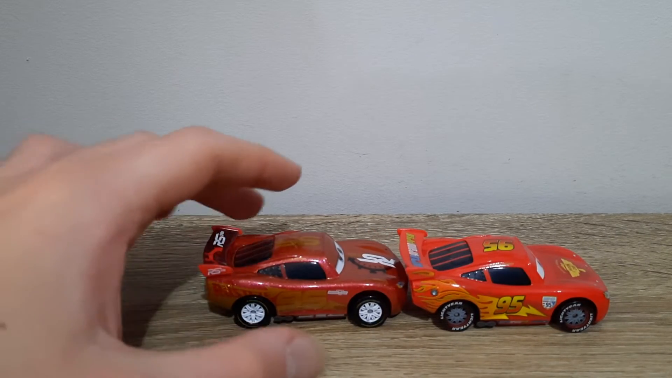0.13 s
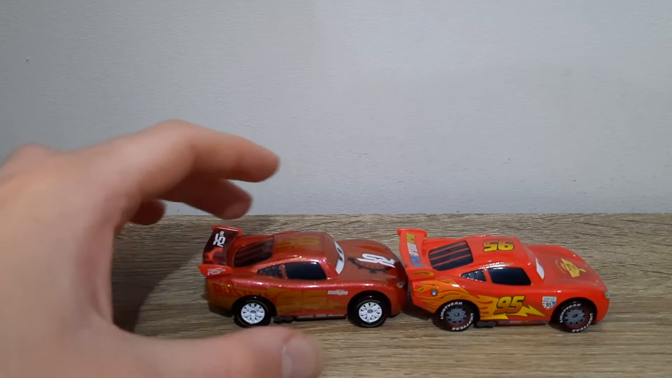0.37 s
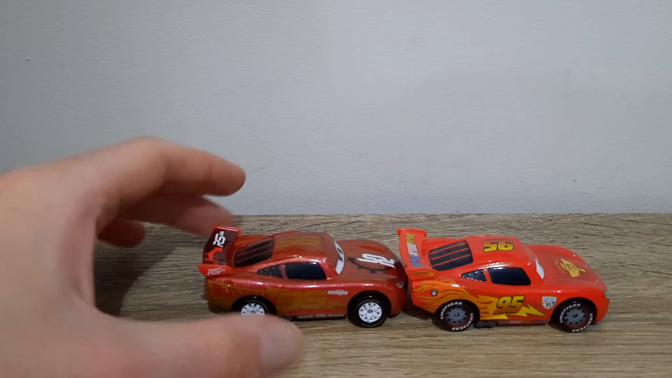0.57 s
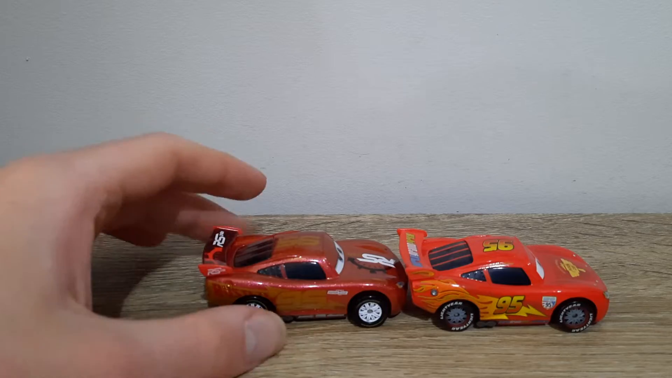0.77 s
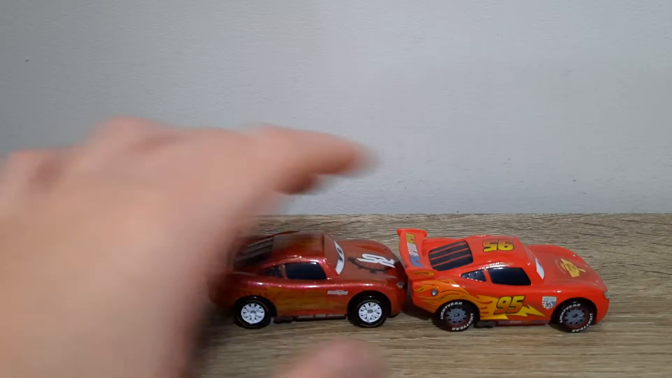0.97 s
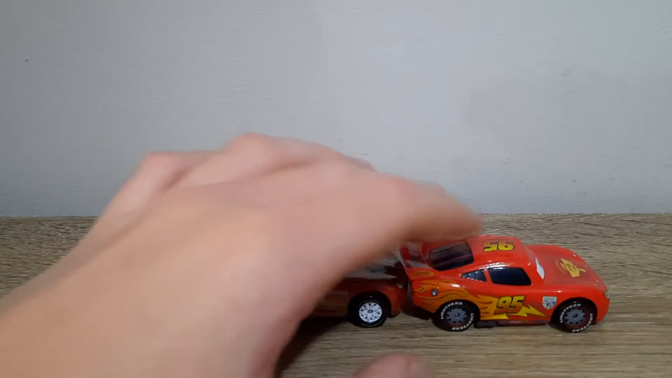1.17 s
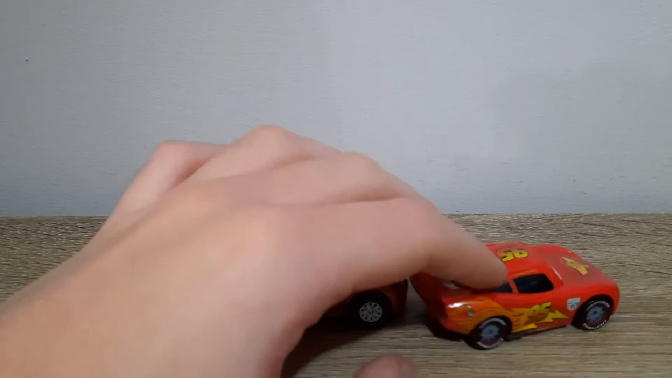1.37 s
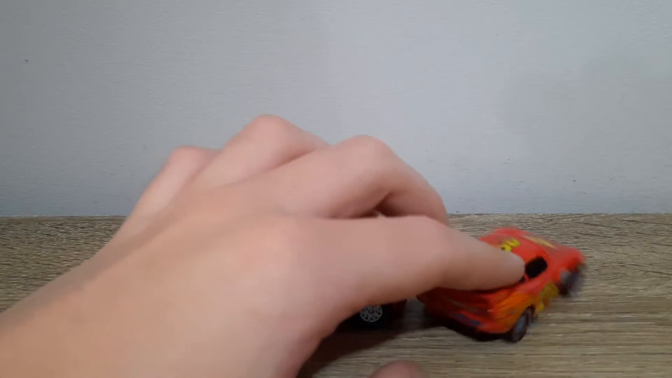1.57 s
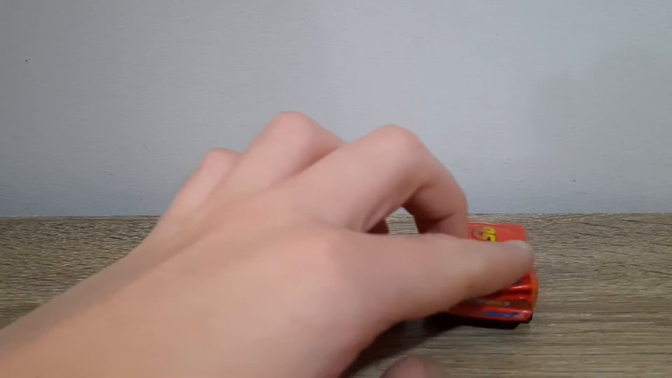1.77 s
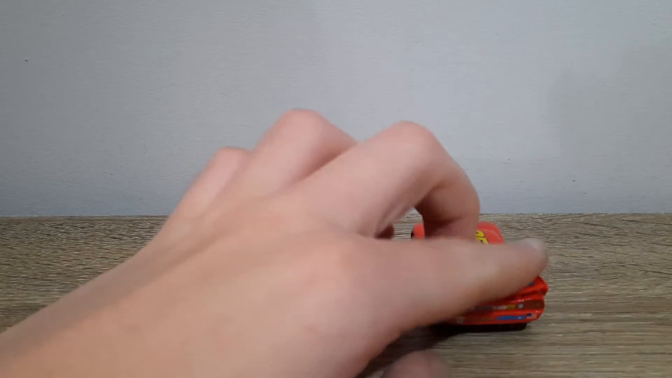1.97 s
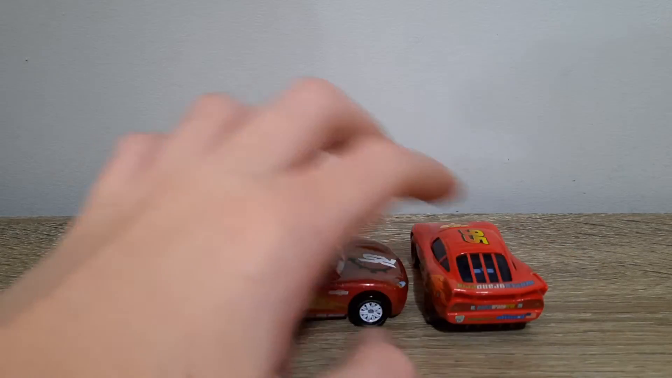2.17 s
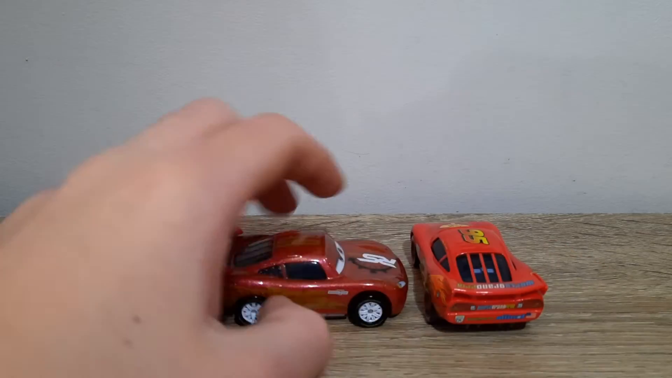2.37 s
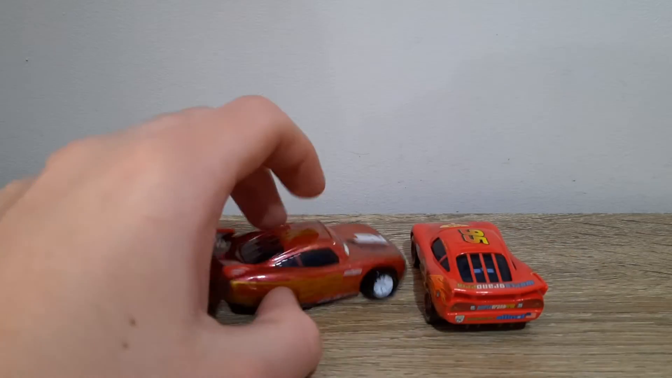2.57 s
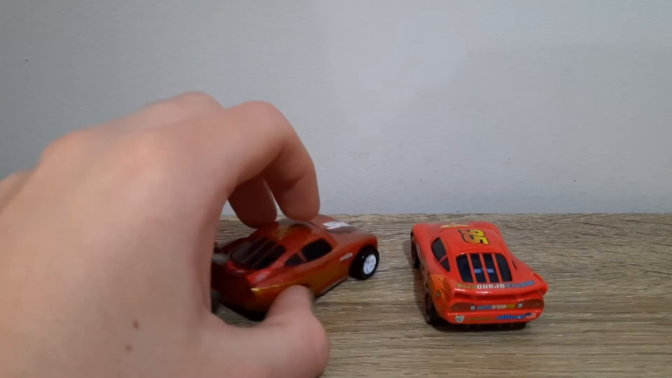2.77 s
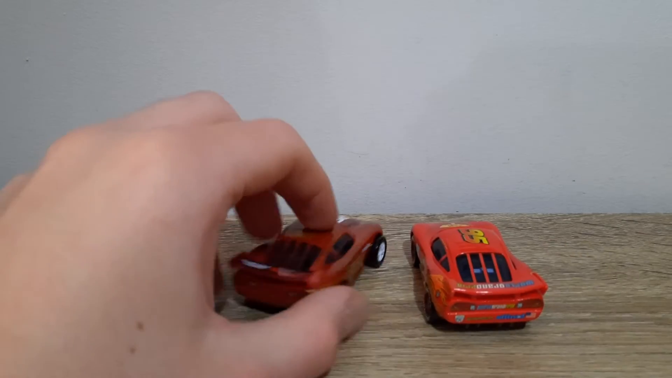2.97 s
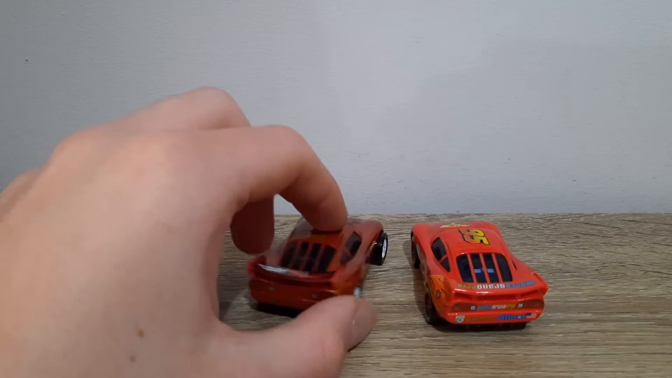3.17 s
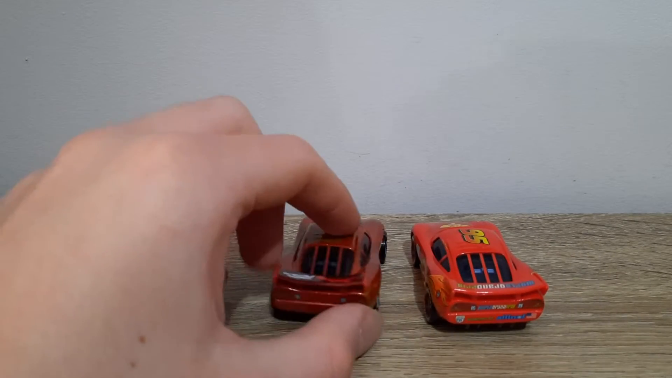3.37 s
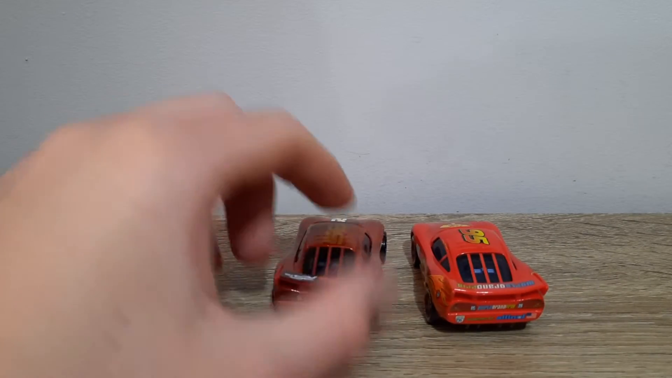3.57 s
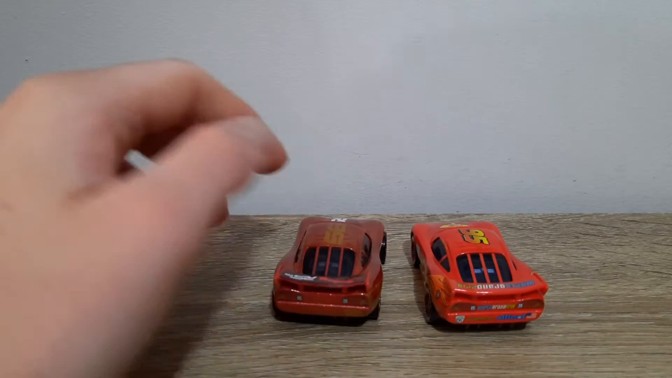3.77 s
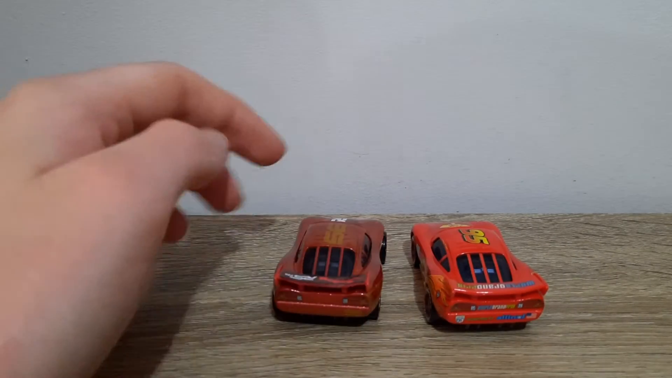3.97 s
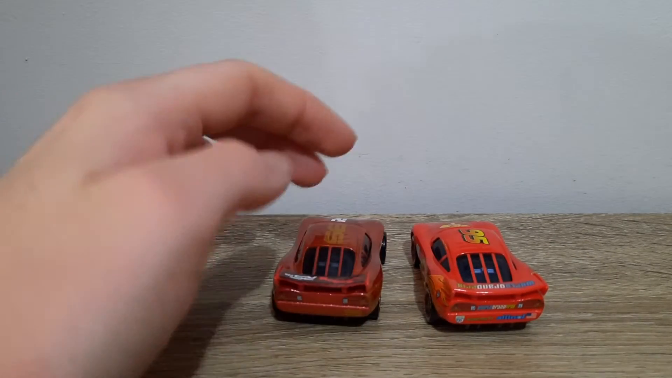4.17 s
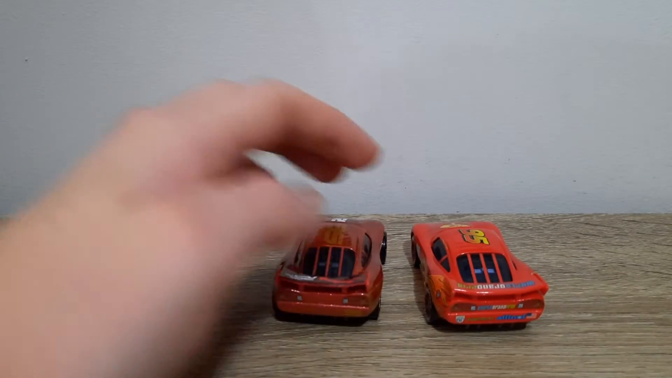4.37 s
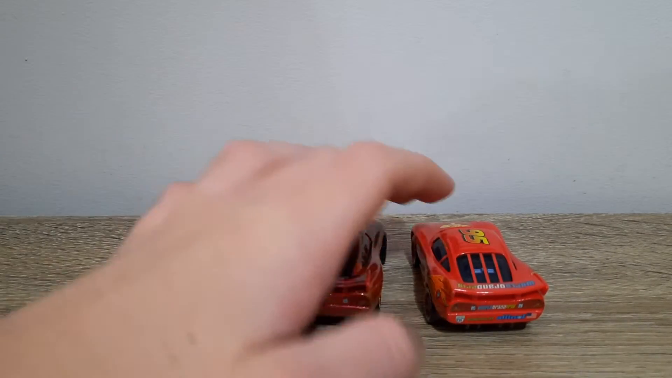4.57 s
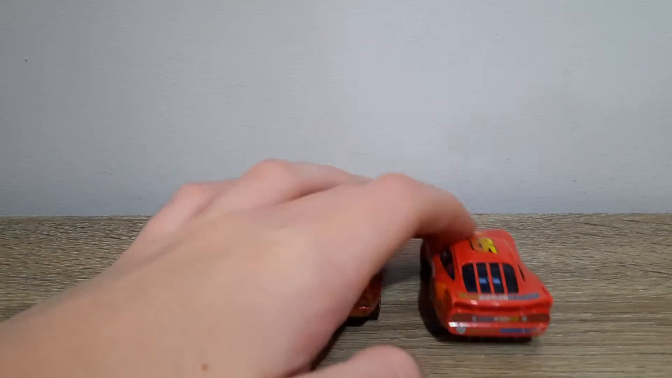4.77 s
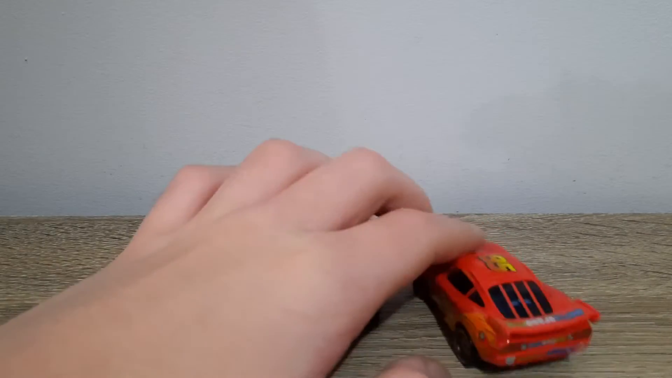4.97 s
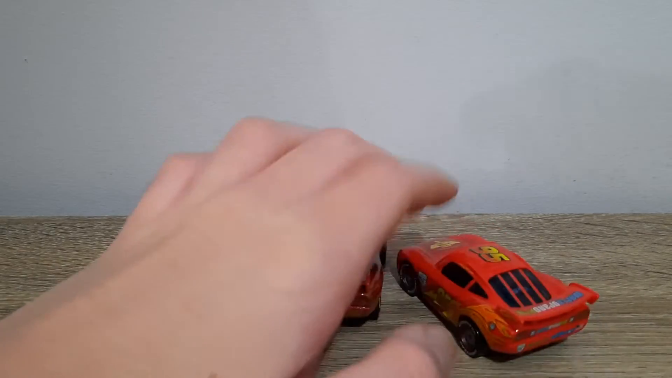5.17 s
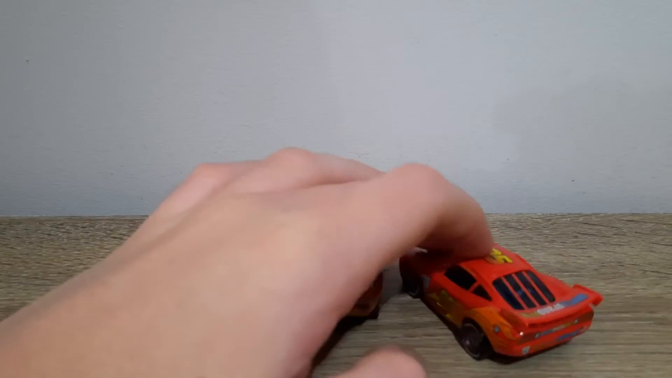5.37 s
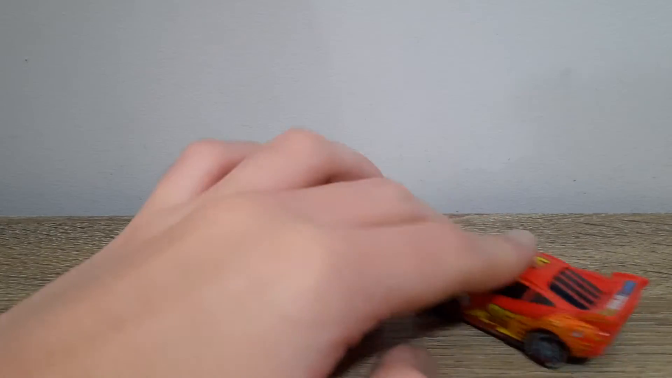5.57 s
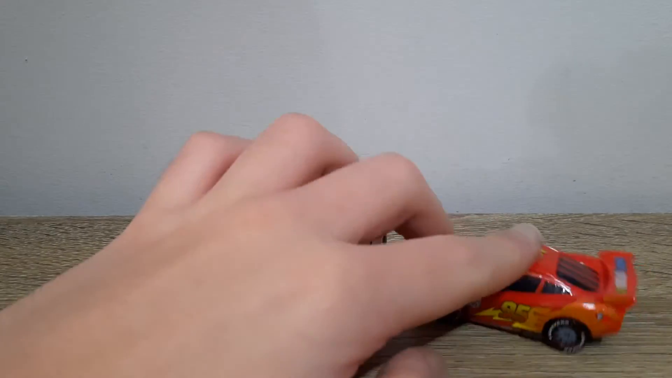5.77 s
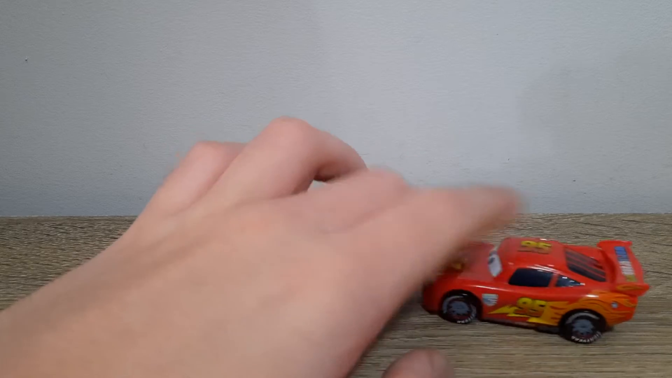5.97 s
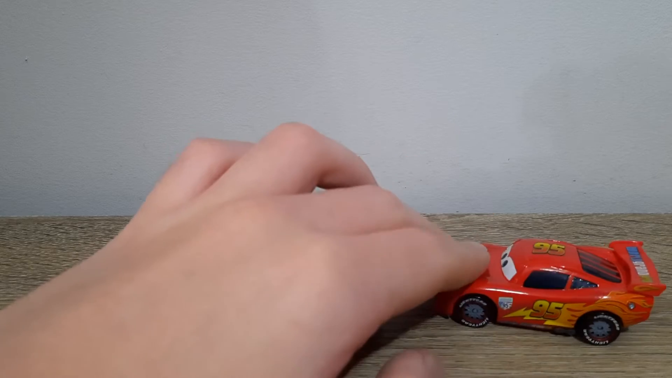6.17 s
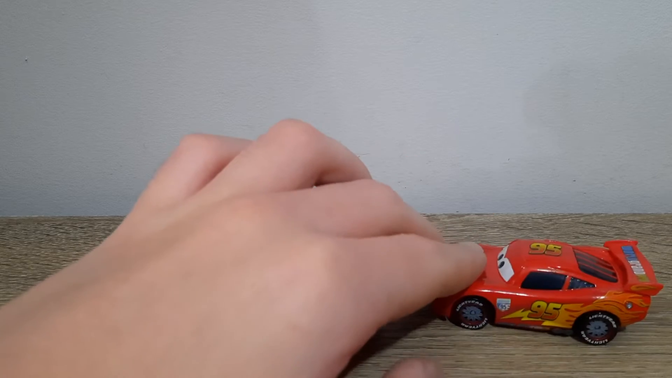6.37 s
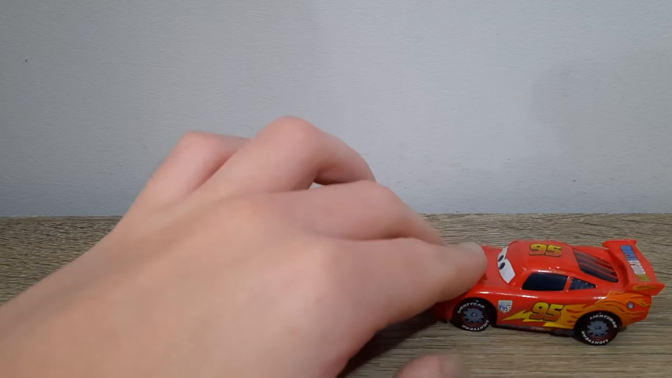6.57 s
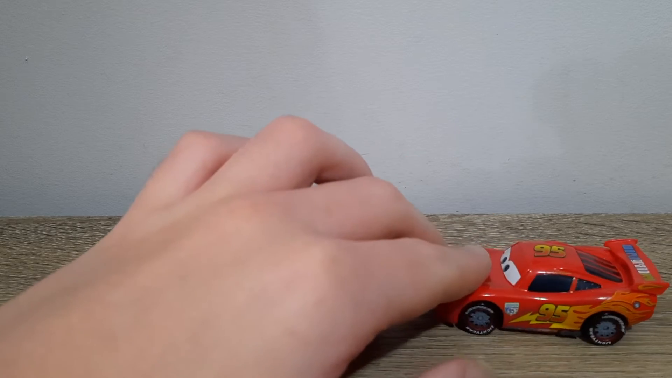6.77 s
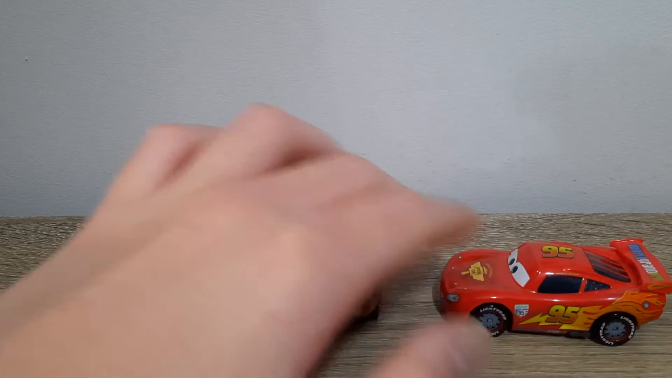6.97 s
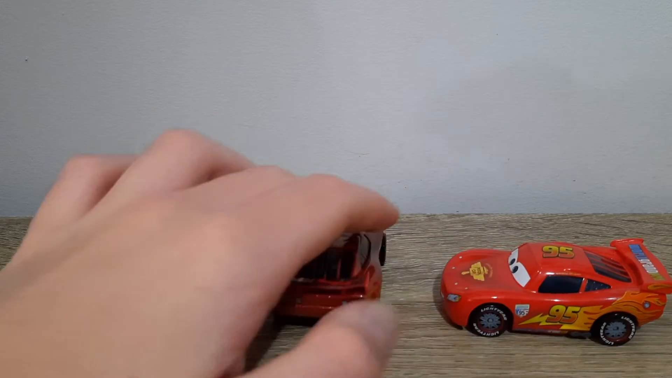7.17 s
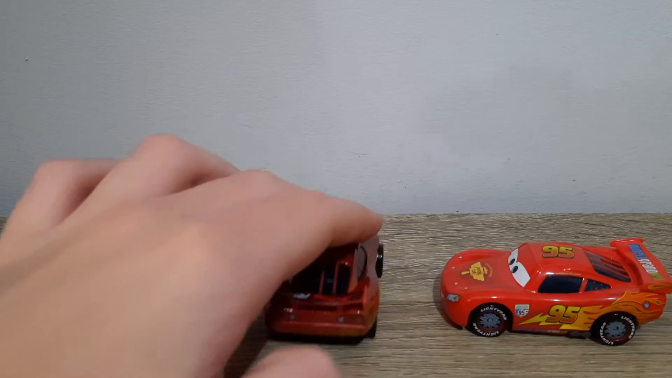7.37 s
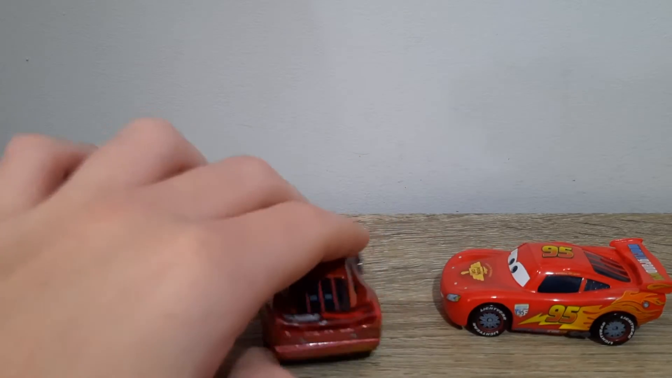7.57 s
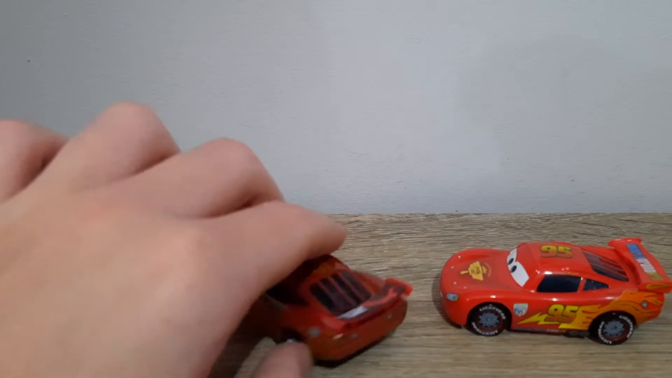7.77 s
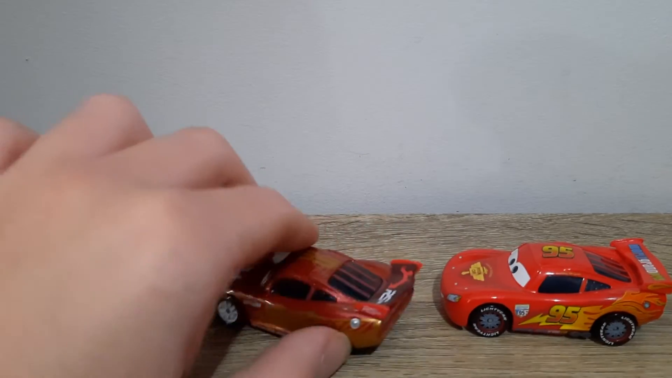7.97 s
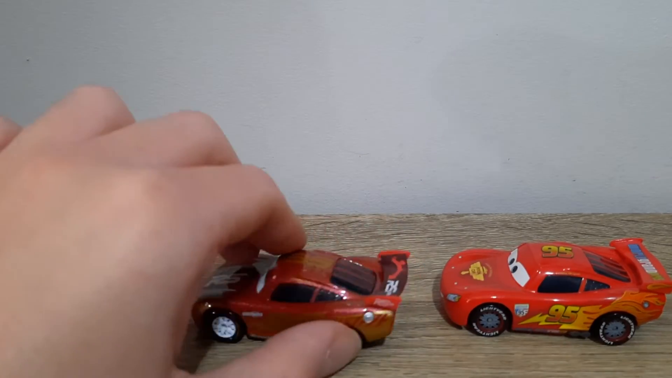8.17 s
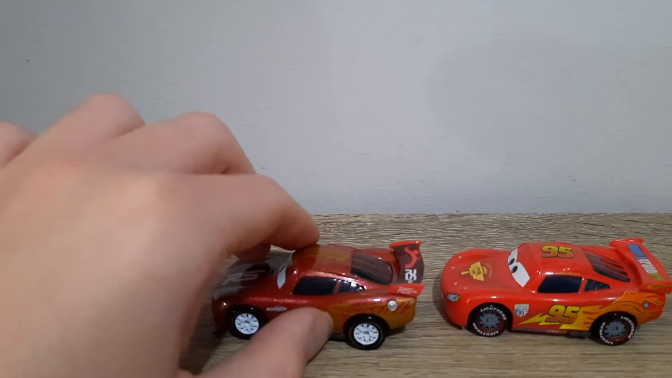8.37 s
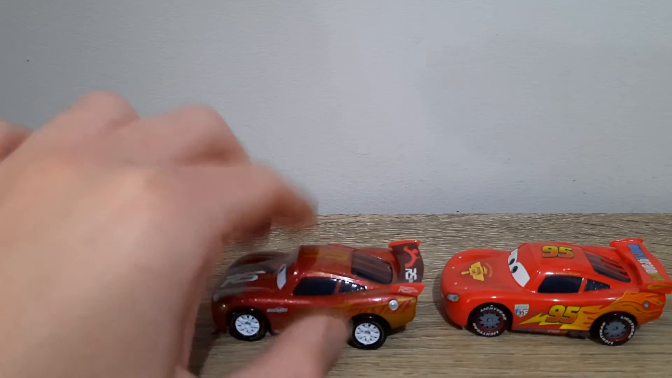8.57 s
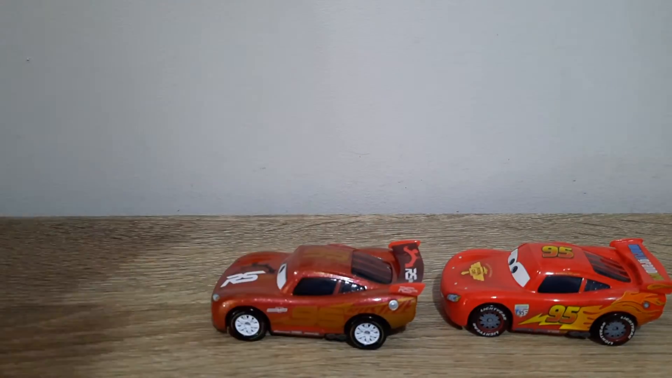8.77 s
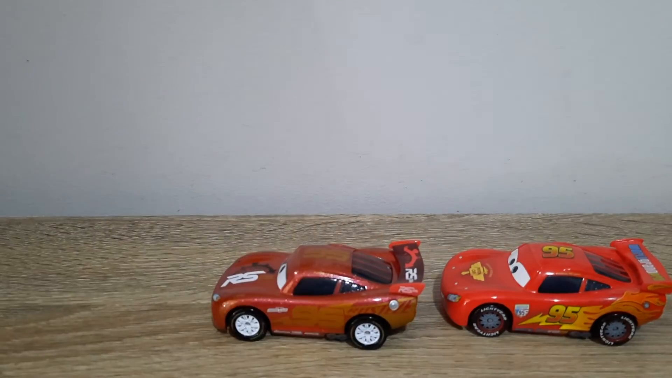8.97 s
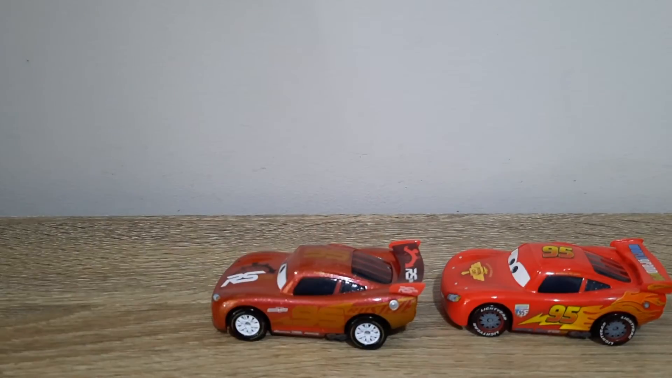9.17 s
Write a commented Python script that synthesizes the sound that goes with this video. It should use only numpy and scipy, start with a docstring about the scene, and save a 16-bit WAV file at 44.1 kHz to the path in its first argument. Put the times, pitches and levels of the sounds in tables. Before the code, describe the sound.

Two small toy cars are twisted by hand on a wooden table, wheels stuttering and rattling with low thumps, ending in a muffled rub and sharp knock.

```python
"""Two toy cars, an orange and a dark red one, are turned round by hand on a wooden table, close to a phone.
Stuttering wheels and low thumps drive the table's damped modes; jolts and skids drive shells and axles.
Tyres squeal by stick-slip as gliding harmonics; axles chirp and wheels creak as jittered sine glides.
At the end a muffled rub (coloured grains) and a sharp knock (case modes) come beside the left microphone.
A short noise tail stands for the small room, and coloured noise for its low rumble and faint hiss."""
import sys
import numpy as np
from scipy import signal
from scipy.fft import rfft, irfft, next_fast_len
from scipy.io import wavfile
from scipy.ndimage import uniform_filter1d

SR = 44100
rng = np.random.default_rng(int(sys.argv[2]) if len(sys.argv) > 2 else 0)


def dump_mix(stems):
    """Bounce the given channels to the path in sys.argv[1] as a 16-bit WAV at rate SR."""
    frames = np.atleast_2d(stems).T  # one column per channel
    limited = np.clip(frames, -1, 1)  # hard clip at full scale
    pcm = np.round(limited * 32767).astype(np.int16)
    wavfile.write(sys.argv[1], SR, pcm)


N = 407043  # samples
T = np.arange(N) / SR  # s
RING_T, SHORT_T = T[:SR // 8], T[:SR // 30]  # s: long and short responses
SIDES = np.array([[.5], [-.5]])  # left and right share of a level or phase difference

# All levels in the tables are relative; each layer adds its own trim.
# Shoves of a car. Each row: start of full speed in seconds, hold, rise and fall in seconds, drumming in dB,
# then relative to the drumming: weight on the table in dB, shell rattle in dB, tyre grit in dB.
SHOVES = [(1.317, 0.087, 0.034, 0.082, -43, 3, -7, -21), (1.553, 0.13, 0.031, 0.078, -40, -2.5, -5.5, -17),
          (1.758, 0.11, 0.045, 0.043, -46.5, -5.5, -5.5, -9.5),
          (1.941, 0.062, 0.019, 0.03, -58, -5, -16, -15),
          (2.368, 0.036, 0.039, 0.073, -53.5, 10.5, -20, -32.5),
          (2.465, 0.016, 0.019, 0.038, -40, 10, -12, -29),
          (2.552, 0.12, 0.0092, 0.034, -39, -8, -14.5, -37), (2.667, 0.085, .02, 0.052, -60, 2, -6, -31),
          (2.792, 0.027, 0.039, 0.1, -44, 8, -9.5, -32), (2.938, 0.12, 0.051, 0.084, -44, 1.5, -22.5, -44),
          (3.043, 0.008, 0.023, 0.08, -42.5, 7.5, -23, -38),
          (3.25, 0.048, 0.15, 0.11, -48.5, 1, -25.5, -51),
          (3.336, 0.11, 0.15, 0.047, -53.5, 6.5, -26.5, -53),
          (4.789, 0.042, 0.031, 0.083, -44, 7.5, -15, -28),
          (5.019, 0.016, 0.073, 0.029, -24.5, 2, -16.5, -21),
          (5.082, 0.098, 0.06, 0.049, -50, 13.5, -10, -15),
          (5.52, 0.069, 0.055, 0.019, -36.5, -6, -11, -20), (5.633, .04, 0.072, 0.019, -37, 6.5, -22, -41),
          (5.762, 0.16, 0.056, 0.027, -39.5, -3.5, -11.5, -29),
          (5.98, 0.13, .05, 0.098, -72.5, 17.5, -13, -3.5), (6.18, 0.092, 0.031, 0.17, -65.5, 6, -16, -20),
          (6.439, 0.089, 0.03, 0.12, -68.5, 4, -18.5, -30.5),
          (6.79, 0.0079, 0.011, 0.36, -68.5, 4.5, 1, -12.5),
          (7.414, 0.13, 0.087, 0.066, -50.5, 12, -30, -31.5), (7.619, 0.16, 0.058, 0.05, -36, 7, -23, -49),
          (7.683, 0.0096, 0.054, 0.022, -33, -10, -23, -46),
          (7.868, 0.05, 0.17, 0.053, -40.5, 6, -18.5, -36.5),
          (8.052, 0.006, 0.056, 0.041, -40, 1, -22, -40.5),
          (8.097, 0.073, 0.052, 0.081, -47.5, 6.5, -19.5, -42),
          (8.314, 0.021, 0.014, 0.069, -45.5, 10.5, -8.5, -28),
          (8.479, 0.08, 0.041, 0.063, -70, 21, -35, -28)]
# Jolts of a chassis in its play. Each row: time in seconds, knock on the table in dB, shell rattle in dB,
# axle tick in dB.
CLACKS = [(1.316, -32, -39, -52), (1.354, -26, -36, -45.5), (1.374, -33, -49, -56.5),
          (1.408, -26, -30.5, -39), (1.552, -40, -57, -47), (1.575, -34.5, -44.5, -47),
          (1.5997, -40.5, -32, -46), (1.619, -38.5, -43, -61), (1.631, -41.5, -39, -48.5),
          (1.641, -40, -38.5, -53), (1.652, -41.5, -37.5, -48), (1.668, -43, -43, -49),
          (1.688, -45, -37, -47), (1.692, -47, -36, -48), (1.733, -58, -52, -54), (1.771, -38, -49, -55),
          (1.808, -53, -42.5, -49.5), (1.826, -48, -48, -49), (1.8586, -40, -45.5, -44),
          (1.931, -53.5, -61, -59), (2.384, -49, -66, -79), (2.442, -46.5, -46, -53.5),
          (2.4857, -36.5, -43, -44), (2.553, -41.5, -39.5, -49), (2.58, -66.5, -54, -51.5),
          (2.606, -35, -36.5, -56.5), (2.629, -43.5, -38, -45), (2.6438, -33, -34.5, -41.5),
          (2.7648, -42, -52, -52.5), (2.7967, -37, -42.5, -61.5), (2.823, -41, -47.5, -57),
          (2.846, -45.5, -63, -73), (2.9394, -50, -49, -61), (3.028, -39.5, -58, -62.5),
          (3.0557, -42, -45.5, -56), (3.1917, -74, -67, -64.5), (3.226, -46, -78, -77.5),
          (3.2449, -40.5, -77, -84), (3.276, -47.5, -60, -79), (4.7335, -55, -51, -62.5),
          (4.7834, -46, -47.5, -60), (4.810, -40.5, -50, -59.5), (4.9168, -39, -48, -64),
          (4.951, -51, -43.5, -62), (4.9774, -42, -44, -48.5), (4.9941, -27, -32.5, -49.5),
          (5.012, -30, -46, -45), (5.024, -27.5, -52, -46.5), (5.036, -30.5, -43, -44),
          (5.079, -38, -58, -57), (5.1327, -41, -53, -60.5), (5.18, -49, -63, -61), (5.296, -64, -63, -66),
          (5.4745, -39.5, -69, -68), (5.5027, -33.5, -41, -57), (5.528, -29, -38, -44),
          (5.547, -34.5, -53, -58), (5.585, -30, -47, -59), (5.651, -35.5, -60, -92),
          (5.755, -38, -60, -71), (5.7849, -38.5, -48, -53), (5.8135, -27.5, -35.5, -49.5),
          (5.848, -33.5, -42, -57.5), (5.882, -35, -42.5, -54), (5.915, -35, -48, -61),
          (5.966, -72, -56, -76), (5.985, -50, -66, -71), (6.0087, -75, -73, -81), (6.09, -55, -80, -83),
          (6.1763, -64.5, -75, -77), (6.2057, -54, -72, -82), (6.434, -59.5, -80, -96),
          (6.49, -60.5, -73, -97), (6.8098, -39, -46, -46.5), (7.586, -39.5, -70.5, -74),
          (7.6163, -34, -58, -71.5), (7.662, -36, -56, -66), (7.705, -29, -46, -55.5),
          (7.763, -35.5, -59, -61.5), (7.861, -36, -37, -50), (7.883, -45, -49, -73.5),
          (7.902, -34.5, -45, -68), (7.915, -35.5, -53, -67), (8.052, -41, -53.5, -64),
          (8.103, -37.5, -60, -59), (8.173, -37.5, -55.5, -69), (8.3099, -42.5, -46.5, -45.5),
          (8.320, -39, -50, -53), (8.336, -36.5, -49, -54), (8.356, -43.5, -51, -55.5),
          (8.38, -44.5, -52.5, -55), (8.403, -46, -55, -61), (8.417, -48, -58, -65.5),
          (8.464, -49, -75, -60.5)]
# Low thumps and dull knocks on the table, from fingers, wrist or a car set down hard.
# Each row: time in seconds, low modes in dB, upper modes in dB.
THUMPS = [(0.942, -38, -51.5), (0.976, -34.5, -64), (2.188, -39, -74), (2.259, -45, -75),
          (2.621, -20.5, -56.5), (3.075, -27.5, -58), (4.164, -32.5, -65.5), (4.916, -28.5, -60),
          (6.796, -24.5, -51), (6.809, -43, -34.5), (6.925, -45.5, -49.5), (7.193, -43, -62.5),
          (7.331, -34, -46), (7.839, -20.5, -53), (7.854, -19, -61), (8.342, -30, -53), (8.359, -22, -55),
          (8.424, -28, -64.5), (8.494, -32, -46), (8.556, -38.5, -47.5)]
# Low and upper tabletop modes. Each row: frequency in Hz, width in Hz, level in dB,
# left minus right in dB, left's phase lead in radians.
TABLE_LOW = [(108, 29, -13, -3, 0.13), (127.5, 17, 11.5, 2.5, 0.3), (169, 25, 5.5, -1, 0),
             (208, 23, -0.5, 0.5, 0.077), (233, 13, -2, -7, 0.1), (283, 31, 17, -1.5, 0.58)]
TABLE_HIGH = [(540.4, 31.2, 4.5, 0.1, 0.46), (614, 39, -4.5, 1, 0.85), (715, 40, -7, -2.5, -1.5),
              (767.3, 23, -1.5, 1, -2), (958, 54, -14.5, 2.5, 3.5), (1096, 40, -10, 5, 3),
              (1310, 40, -12, 3, -4.5)]
TABLE_SCATTER, TABLE_DETUNE = .35, .014  # the modes change in balance and pitch as car and hand move


def tabletop(boom_db=-4.5, knock_db=21.0, flurry_db=-2, thud_db=17, thump_db=19, tap_db=16,
             settle_db=-17, settle_s=0.012, count=12):
    """Modal excitation: wheels, jolts and thumps ring the same board, its upper modes varying with the spot."""
    s, knock, _, _ = np.transpose(CLACKS)
    thump_s, thump, tap = np.transpose(THUMPS)
    shoves = np.array(SHOVES)
    *_, drumming, weight, _, _ = shoves.T
    orange, red = by_car(SHOVES)

    boom = band(grains(per_s=1500, spread_db=2), lo_hz=76.6, hi_hz=2000)
    low = undb(boom_db) * rolling(shoves, drumming + weight, BOOM_POWER) * boom
    low += blows(s, knock + thud_db, push_s=0.00023)
    low += blows(thump_s, thump + thump_db, push_s=0.001)
    settling = chatter(thump_s, thump + settle_db, np.full(len(thump_s), settle_s))
    low += settling * grains(per_s=780, spread_db=-2.0)  # each thump trails off in a few small contacts

    high = tyres(orange, roll_db=-5.0, slip_db=-11.0, slip_hz=265.5, bright_hz=1010)
    high += tyres(red, roll_db=-8.5, slip_db=-7.0, slip_hz=271.8, bright_hz=1900)
    high += jolts(s, knock + knock_db)
    high += blows(thump_s, tap + tap_db, push_s=0.000078)
    bouncing = chatter(s, knock + flurry_db, 1.57 * flurry_times(len(s)))
    high += bouncing * grains(per_s=3000, spread_db=2.5)  # the wheels bounce after a jolt

    spots = [ring(TABLE_HIGH, scatter=TABLE_SCATTER, detune=TABLE_DETUNE) for _ in range(count)]
    return through(low, ring(TABLE_LOW)) + shifting(high, spots)


def tyres(shoves, roll_db, slip_db, slip_hz, bright_hz):
    """Rolling contact: grain bumps plus stick-slip push the board; harder tyres reach higher."""
    *_, drumming, _, _, _ = shoves.T
    bumps = undb(roll_db) * grains(per_s=1400, spread_db=-0.5)
    force = bumps + undb(slip_db) * slips(slip_hz, glide=0.17, jitter=0.03516)
    return rolling(shoves, drumming, 0.72) * band(force, lo_hz=257, hi_hz=bright_hz)


def slips(hz, glide, jitter):
    """Stick-slip friction: a tyre dragged sideways lets go in pulses at a wandering rate; rms 1."""
    rate = hz * np.exp(glide * walk(rate=26) + jitter * walk(rate=500))
    pulses = np.diff(np.floor(np.cumsum(rate) / SR), prepend=0) / np.sqrt(rate)
    return pulses / pulses.std()


# The speed drops by EDGE_DB over one rise or fall time, and slightly more slowly beyond.
EDGE_DB, EDGE_CURVE = 23.5, 0.92
BOOM_POWER, RATTLE_POWER, GRIT_POWER = 0.6, 0.85, 0.55  # each sound grows as this power of the wheel speed


def rolling(shoves, db, power):
    """Speed-dependent excitation: the gain follows the wheel speed's rise, hold and fall in every shove."""
    t = np.arange(0, N, SR // 1000) / SR
    s, hold, rise, fall = shoves.T[:4, :, None]
    away = np.maximum(s - t, 0) / np.abs(rise) + np.maximum(t - s - hold, 0) / np.abs(fall)
    speed_db = -EDGE_DB * away ** EDGE_CURVE
    gain = np.linalg.norm(undb(db[:, None] + power * speed_db), axis=0)  # shoves add in power
    return np.interp(T, t, gain)


# A jolting tyre catches a few times in a row. Each entry: level of one catch in dB.
CATCHES_DB = [-4.5, 0.5, -5.5]
CATCH_S, CATCH_SCATTER = 0.00361, .06  # s between catches; relative spread from jolt to jolt


def jolts(times, db, lag_s=.002):
    """Repeated impact: each jolt pushes the board in a quick run of catches."""
    gap = CATCH_S * np.exp(CATCH_SCATTER * rng.standard_normal((len(times), 1)))
    catches = times[:, None] + lag_s + (np.arange(len(CATCHES_DB)) - 1) * gap
    return blows(catches.ravel(), (db[:, None] + CATCHES_DB).ravel(), push_s=0.00014)


# Shell modes of either car. Each row: frequency in Hz, width in Hz, level in dB,
# left minus right in dB, left's phase lead in radians.
ORANGE_SHELL = [(1270, 210, -0.5, 12.5, -6.5), (1896, 88, 5, 6.5, 0), (1900, 450, 5.5, 9, -4.5),
                (2470, 88, -6, -10, 3), (2720, 180, -17.5, 1, 2), (2930, 140, -6.5, 1.5, -3.5),
                (3436, 93, -7.5, -4, -1), (3878, 180, -13, -4.5, -1), (4250, 180, -12.5, -11.5, 3)]
RED_SHELL = [(1083, 54, -2, 16, 3), (1236, 190, -1, 10, 0.5), (1895, 100, -3, 18, -1),
             (2100, 220, 9.5, -2, 1.5), (2510, 230, -0.5, -3.5, -0.5), (2793, 82, -3.5, 7.5, -4),
             (3150, 37, -5, -3, -7.5), (4320, 110, -17.5, 25, -16), (4570, 110, -2, -5, -6),
             (4700, 75, -10.5, -8.5, -2)]


def cars():
    """Superposition: the two cars' sounds add, though the hand works on one at a time."""
    orange_shoves, red_shoves = by_car(SHOVES)
    orange_clacks, red_clacks = by_car(CLACKS)
    orange_car = car(orange_shoves, orange_clacks, ORANGE_SHELL, rattle_db=1.0, grit_db=-4.0, clack_db=2.5,
                     tick_db=6.5, stutter_db=4.5, crack_db=-8.5, fizz_db=2.5, pan_db=-7)
    red_car = car(red_shoves, red_clacks, RED_SHELL, rattle_db=5, grit_db=12.5, clack_db=4.5,
                  tick_db=5.0, stutter_db=1.5, crack_db=-3.0, fizz_db=-2.0, pan_db=-3.0)
    return orange_car + red_car


# Turns of the red car; the orange one has the rest. Each row: start in seconds, end in seconds.
RED_TURNS = [(2.2, 4.0), (6.6, 8.7)]


def by_car(table):
    """Separation in time: share out the rows of a table, the orange car's, then the red car's."""
    rows = np.array(table)
    red = np.any([(rows[:, 0] > start) & (rows[:, 0] < end) for start, end in RED_TURNS], axis=0)
    return rows[~red], rows[red]


# Axle modes of both cars. Each row: frequency in Hz, width in Hz, level in dB,
# left minus right in dB, left's phase lead in radians.
AXLE_MODES = [(5300, 860, -1, -10.5, -0.5), (6300, 260, -2, -10.5, -2), (6200, 780, -3, -8.5, 7),
              (8000, 1100, -8.5, -6.5, 1), (8180, 290, 0, -5, -1.5), (10100, 2000, -6, -7, -4),
              (11300, 770, -1.5, -12, 5.5), (11600, 1200, 0.5, -4.5, 4), (13920, 5800, -5, -5.5, -1.5)]
SHELL_DETUNE = .04  # relative spread of the shell's modes as the fingers press and turn it


def car(shoves, clacks, shell, rattle_db, grit_db, clack_db, tick_db, stutter_db, crack_db, fizz_db,
        pan_db, count=20):
    """Stick-slip into resonators: each catch of the skidding wheels shakes the shell and ticks the axles."""
    s, _, clack, tick = clacks.T
    *_, drumming, _, shake, scrape = shoves.T
    length = flurry_times(len(s))
    catches = undb(stutter_db * walk(rate=150)) * grains(per_s=1800, spread_db=1.5)
    flurry = grains(per_s=5500, spread_db=-1.0)

    rattle = undb(rattle_db) * rolling(shoves, drumming + shake, RATTLE_POWER) * catches
    rattle += chatter(s, clack + clack_db, length) * flurry
    grit = undb(grit_db) * rolling(shoves, drumming + scrape, GRIT_POWER) * catches
    grit += chatter(s, tick + tick_db, length) * flurry

    bodies, axles = [], []
    for _ in range(count):
        body = ring(shell, scatter=0.57, detune=SHELL_DETUNE, t=SHORT_T)
        body_crack = crack(lo_hz=950, hi_hz=5060, decay_s=0.011, pan_db=pan_db / 2)
        bodies.append(unit(body + undb(crack_db) * body_crack))
        axle = ring(AXLE_MODES, scatter=0.71, detune=0.024, t=SHORT_T)
        fizz = crack(lo_hz=4930, hi_hz=16400, decay_s=0.0013, pan_db=pan_db)
        axles.append(unit(axle + undb(fizz_db) * fizz))
    return shifting(rattle, bodies) + shifting(grit, axles)


CHATTER_S, CHATTER_SCATTER = 0.002, 0.16  # s a flurry takes to swell; relative spread from jolt to jolt


def flurry_times(count):
    """Log-normal scatter: every jolt chatters for about the same time."""
    return CHATTER_S * np.exp(CHATTER_SCATTER * rng.standard_normal(count))


# A tyre dragged sideways. Each row: start in seconds, length in seconds, first pitch in Hz, last pitch in Hz,
# level in dB, extra level of the third harmonic and up in dB.
SQUEALS = [(3.242, 0.045, 279, 269, -37, -9), (3.343, 0.034, 260, 269, -53, 8),
           (3.372, 0.089, 258.4, 276.6, -47, -9), (3.425, 0.028, 262, 250, -64, 9.5),
           (7.57, 0.047, 265, 294, -37.5, 5), (7.612, 0.064, 262, 277.5, -36, 4),
           (7.69, 0.052, 264, 279, -27, 2), (7.752, 0.033, 291.5, 304, -37, -2),
           (8.035, 0.042, 248.7, 278, -42.5, 14.5)]
# Harmonics from the fundamental up. Each entry: level in dB.
SQUEAL_HARMONICS = [-8, -0.5, -13, -27.5, -39.5]


def squeals(squeal_db=3, jitter=0.018, flutter_db=2, pan_db=1):
    """Periodic stick-slip: where a tyre slips evenly, the table sings a short, gliding harmonic note."""
    out, wobble = np.zeros(N), np.exp(jitter * walk(rate=300))
    for s, length, first_hz, last_hz, db, overtones in SQUEALS:
        at, progress, shape = short_rub(s, length)
        pitch = (first_hz + (last_hz - first_hz) * progress) * wobble[at]
        phase = 2 * np.pi * np.cumsum(pitch) / SR
        for k, level in enumerate(SQUEAL_HARMONICS, 1):
            gain = undb(db + level + overtones * (k > 2))
            out[at] += gain * shape * np.sin(k * phase + 2 * np.pi * rng.random())
    return out * undb(squeal_db + flutter_db * walk(rate=290) + SIDES * pan_db)


# A dry axle or a wheel rubbing its arch chirps. Each row: start in seconds, length in seconds,
# middle pitch in Hz, glide in octaves, level in dB.
CHIRPS = [(1.296, 0.029, 7600, -0.099, -57.5), (1.568, 0.023, 13300, -0.13, -49),
          (1.683, 0.045, 1810, -0.032, -45), (1.69, 0.026, 8200, .1, -47),
          (2.578, 0.018, 1730, -0.088, -49.5), (2.622, 0.031, 6600, 0.068, -53.5),
          (2.794, 0.044, 5620, -.05, -55.5), (2.922, 0.088, 7000, -0.015, -64),
          (3.028, 0.045, 7170, 0.025, -54), (5.008, 0.0098, 8600, -0.025, -43),
          (5.021, 0.0089, 11800, 0.011, -41), (5.513, 0.038, 4160, 0.041, -44.5),
          (6.005, 0.044, 1925, -0.015, -68), (6.081, 0.028, 2050, 0.012, -67),
          (6.204, 0.13, 1800, 0.064, -83), (6.103, 0.024, 6000, -0.072, -74.5),
          (7.733, 0.089, 5460, 0.18, -61), (8.312, 0.023, 5700, -0.06, -50)]
# A wheel twisted under the fingers creaks. Each row: start in seconds, length in seconds,
# middle pitch in Hz, glide in octaves, level in dB.
CREAKS = [(1.538, .024, 780, 0, -37.5), (2.785, .065, 890, -.15, -49.5), (2.965, .08, 774, .1, -49.5),
          (3.243, .027, 1300, .05, -58.5), (3.265, .025, 1510, 0, -66.5), (3.275, .04, 620, .05, -46),
          (3.282, .024, 810, .05, -53.5), (3.35, .034, 785, -.1, -57), (3.353, .024, 1090, 0, -57),
          (3.39, .026, 1300, .03, -64), (3.405, .042, 740, .22, -54), (3.425, .035, 1040, .08, -58),
          (5.44, 0.034, 760, -.25, -52.5), (5.715, 0.043, 770, 0, -51.5), (7.612, .042, 830, -.1, -38),
          (7.692, .035, 2280, .05, -47.5), (7.755, 0.025, 608, 0, -41), (7.875, .055, 1302, .07, -43),
          (7.9, .025, 670, .12, -54), (8.04, .03, 1050, .12, -44.5), (8.102, .028, 1260, .1, -57),
          (8.152, .036, 830, -.2, -46)]


def squeaks():
    """Friction-driven tones: axle chirps and wheel creaks, each kind with its own rasp."""
    axle_chirps = chirps(CHIRPS, chirp_db=4, rasp_db=5, pan_db=-3)
    return axle_chirps + chirps(CREAKS, chirp_db=1, rasp_db=1.5, pan_db=4.5)


def chirps(rows, chirp_db, rasp_db, pan_db, jitter=.07):
    """Random frequency modulation: pitch scatter, separate at the two microphones, makes brief tones rasp."""
    out = np.zeros((2, N))
    wobble = np.exp(jitter * np.array([walk(rate=2500) for _ in range(2)]))
    for s, length, hz, glide, db in rows:
        at, progress, shape = short_rub(s, length)
        pitch = hz * 2 ** (glide * (progress - .5)) * wobble[:, at]
        out[:, at] += undb(db) * shape * np.sin(2 * np.pi * np.cumsum(pitch, axis=1) / SR)
    return out * undb(chirp_db + rasp_db * walk(rate=590) + SIDES * pan_db)


def short_rub(s, length):
    """Half-sine envelope: one short rub's samples, progress from 0 to 1, and rounded rise and fall."""
    at = np.arange(int(s * SR), min(int((s + length) * SR), N))
    progress = np.linspace(0, 1, len(at))
    return at, progress, np.sin(np.pi * progress)


# Skin rubs on the phone's case. Each row: time in seconds, dull boom in dB, friction in dB.
RUB = [(8.70, -65, -66), (8.735, -68.5, -64), (8.746, -33, -46), (8.766, -27.5, -45), (8.805, -37.5, -49),
       (8.843, -39, -70.5), (8.88, -56.5, -79), (8.91, -53, -81)]
# Spectra of the boom and of the friction. Each row: frequency in Hz, level in dB.
RUB_COLOUR = [(24, -49), (40, -32), (60, 4), (119, -8), (149, 7), (230, -6.5), (342, -2.5), (475, -26),
              (595, -23), (826, -47), (2500, -54.5), (3250, -65.5), (5500, -110)]
FRICTION_COLOUR = [(250, -32), (450, -13.5), (610, 6.5), (780, -13.5), (1000, -17.5), (1300, -36),
                   (3000, -47), (8000, -39.5), (16000, -67.5)]
# A quick run of contacts beside the left microphone and two faint after-taps.
# Each row: time in seconds, level in dB.
KNOCK = [(8.915, -10.5), (8.9191, -7.5), (8.923, -13), (8.924, -1), (8.9273, -0.5), (8.9300, 3.5),
         (9.022, -26.5), (9.051, -35)]
# Modes of the phone's case. Each row: frequency in Hz, width in Hz, level in dB,
# left minus right in dB, left's phase lead in radians.
CASE_MODES = [(142, 71, -18.5, 20, 0.033), (215, 42, -7, 22, 0.0029), (290, 92, 11, 33, 0),
              (572, 73, 6.5, 33, 0.0095), (670, 36, -5, 27, 0.021), (960, 150, 19.5, 15.5, 0.026),
              (1080, 140, 20, 17, 0.011), (1263, 77, -4.5, 50, 0.016), (1750, 200, 4, 9.3, 0.021),
              (2620, 560, 4, 41, 0.013), (3080, 81, -4.5, 24, 0.0039)]


def handling(rub_db=0, rub_pan_db=3, knock_db=-1, scratch_db=-37, thud_db=-10):
    """Friction and impact: a dull rub on the case, then a scratchy knock at its left port shakes the table."""
    boom = coloured(RUB_COLOUR, grains(per_s=400, spread_db=-5.0))
    friction = coloured(FRICTION_COLOUR, grains(per_s=1300, spread_db=-0.5))
    rub = boom * gain_curve(np.array(RUB)[:, :2]) + friction * gain_curve(np.array(RUB)[:, ::2])
    s, db = np.transpose(KNOCK)
    knock = through(blows(s, db + knock_db, push_s=.00002), ring(CASE_MODES))
    thud = through(blows(s, db + thud_db, push_s=0.00055), ring(TABLE_LOW + TABLE_HIGH))
    scratch = chatter(s, db + scratch_db, np.full(len(s), .0012)) * rng.standard_normal(N)
    scratch = through(scratch, crack(lo_hz=2500, hi_hz=16900, decay_s=0.00057, pan_db=9.0))
    return rub * undb(rub_db + SIDES * rub_pan_db) + knock + thud + scratch


def room(x, t60_s=.27, wet_db=-15.5, top_hz=11000):
    """Reverberant decay: a small bare room answers with a short tail of exponentially dying noise."""
    t = T[:SR // 2]
    tail = rng.standard_normal((2, SR // 2)) * undb(-60 * t / t60_s) * (t > .004)
    return x + undb(wet_db) * through(x, unit(band(tail, lo_hz=185, hi_hz=top_hz)))


# Spectrum of the quiet room. Each row: frequency in Hz, relative density in dB per Hz.
HUSH_COLOUR = [(15, -44), (25, -25), (38, -20), (97, -3), (127, -12), (229, -19.5), (256, -21.5),
               (293, -16), (373, -29.5), (1190, -41.5), (2160, -44.5), (6740, -52), (14800, -48.5),
               (16000, -56)]
HUSH_DB = -66.5


def hush(apart_hz=600):
    """Interchannel coherence: low house rumble nearly alike at both microphones, under a faint wide hiss."""
    mid, side = coloured(HUSH_COLOUR, rng.standard_normal((2, N)))
    side = band(side, apart_hz, SR) + 0.32 * side
    swell = (undb(walk(rate=2.6)) - 1) * band(mid, lo_hz=29.6, hi_hz=390)  # the rumble slowly swells
    return undb(HUSH_DB) * (mid + swell + np.array([[1], [-1]]) * side)


SCATTER_DB = 4.5  # scales how much a mode's level changes with the point of contact


def ring(modes, scatter=0, detune=0, t=RING_T):
    """Modal superposition: damped modes; the contact point scatters level and phase, the grip detunes."""
    chance = rng.standard_normal((len(modes), 4)) * [scatter, scatter, scatter, detune]
    swing = 0
    for (hz, width, db, pan, lead), (louder, turn, late, shift) in zip(modes, chance):
        decay = np.exp(-np.pi * width * t)
        phase = 2 * np.pi * hz * np.exp(shift) * t + SIDES * (lead + turn) + 2 * late
        swing = swing + undb(db + SCATTER_DB * louder + SIDES * pan) * decay * np.sin(phase)
    return unit(band(swing, modes[0][0] / np.sqrt(2), SR))  # little radiates below the lowest mode


def crack(lo_hz, hi_hz, decay_s, pan_db):
    """High modal density: countless short modes of small parts act as decaying noise, one per microphone."""
    burst = rng.standard_normal((2, len(SHORT_T))) * np.exp(-SHORT_T / decay_s)
    return unit(band(burst, lo_hz, hi_hz) * undb(SIDES * pan_db))


GRIP_S = .02  # s for the weight to shift to another point of contact


def shifting(force, responses):
    """Time-varying convolution: as the car rocks and turns, the force meets one response after another."""
    hop = int(GRIP_S * SR)
    fade = np.sin(np.pi * np.arange(2 * hop) / (2 * hop))  # overlapping pieces keep constant power
    out = np.zeros((2, N + SR))
    for start in range(0, N - 2 * hop, hop):
        push = (force[start:start + 2 * hop] * fade)[None]
        piece = signal.fftconvolve(push, responses[rng.integers(len(responses))], axes=-1)
        out[:, start:start + piece.shape[1]] += piece
    return out[:, :N]


def grains(per_s, spread_db):
    """Shot noise: tiny random contacts; positive spread makes a few much harder, negative weaker; rms 1."""
    hits = (rng.random(N) < per_s / SR) * rng.choice([-1, 1], N)
    g = hits * undb(spread_db * np.minimum(rng.exponential(size=N), 4))
    return g / g.std()


def blows(times, db, push_s):
    """Impact duration: one rounded push at each time; a softer contact pushes for longer."""
    force = np.zeros(N)
    np.add.at(force, (np.asarray(times) * SR).astype(int), undb(db))
    push = RING_T * np.exp(-RING_T / push_s)
    return signal.oaconvolve(force, push / push.sum())[:N]


def chatter(times, db, lengths):
    """Power summation: strength of the flurries of micro-impacts that swell and die after each time."""
    power = np.zeros(N + len(RING_T))
    for s, gain, length in zip(times, undb(db), lengths):
        age = RING_T / max(length, 1 / SR)
        power[int(s * SR):int(s * SR) + len(age)] += (gain * age * np.exp(1 - age)) ** 2
    return np.sqrt(power[:N])


def walk(rate):
    """Smoothed random process: slow chance with spread 1, redrawn at the given rate in Hz."""
    k = int(SR / rate)
    w = uniform_filter1d(np.repeat(rng.standard_normal(N // k + 1), k), k)[:N]
    return w / w.std()


def coloured(points, x):
    """Spectral shaping: give x a spectrum of (Hz, dB) points, at rms 1."""
    hz, db = np.transpose(points)
    size = next_fast_len(N)
    f = np.maximum(np.fft.rfftfreq(size, 1 / SR), 1)
    gain = undb(np.interp(np.log(f), np.log(hz), db)) * np.minimum(f / hz[0], 1) ** 2
    y = irfft(rfft(x, size) * gain)[..., :N]
    return y / y.std()


def gain_curve(rows):
    """Amplitude envelope: gain over time from (s, dB) points, silent outside them, edges smoothed."""
    gain = undb(np.interp(T, *np.transpose(rows), left=-np.inf, right=-np.inf))
    return uniform_filter1d(uniform_filter1d(gain, size=SR // 200), size=SR // 200)


def through(x, response):
    """Linear convolution: play a force or a sound through a two-channel response."""
    return signal.oaconvolve(np.atleast_2d(x), response, axes=-1)[:, :N]


def band(x, lo_hz, hi_hz):
    """Band limiting: a gentle causal band-pass."""
    sos = signal.butter(2, [lo_hz, min(hi_hz, .45 * SR)], "band", fs=SR, output="sos")
    return signal.sosfilt(sos, x)


def unit(response):
    """Energy normalisation: scale a response so that it passes white noise at the same level."""
    return response / np.sqrt(np.mean(np.sum(response ** 2, axis=-1)))


def undb(db):
    """Logarithmic level: decibels to gain."""
    return 10 ** (np.asarray(db) / 20)


def scene():
    """Superposition: table, cars and squeaks in the room, handling close by, and the hush."""
    close = room(handling(), t60_s=.24, wet_db=-20, top_hz=16000)
    return room(tabletop() + cars() + squeals() + squeaks()) + close + hush()


TOP_HZ = 16000


def record(dry):
    """Limited bandwidth: the phone thins the deep bass and cuts the top."""
    thinned = signal.sosfilt(signal.butter(2, 45, "high", fs=SR, output="sos"), dry)
    return signal.sosfilt(signal.ellip(10, .2, 70, TOP_HZ, fs=SR, output="sos"), thinned)


dry = scene()
out = record(dry)
dump_mix(out)
```